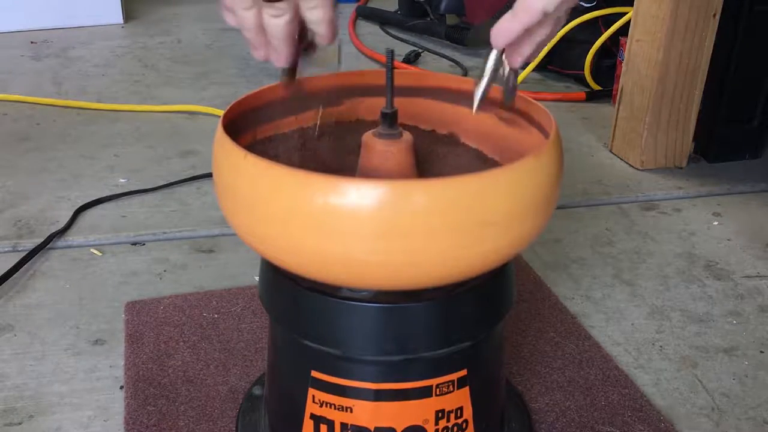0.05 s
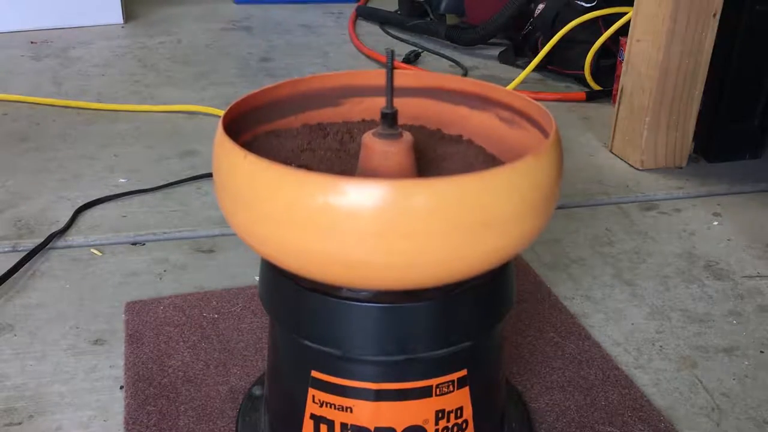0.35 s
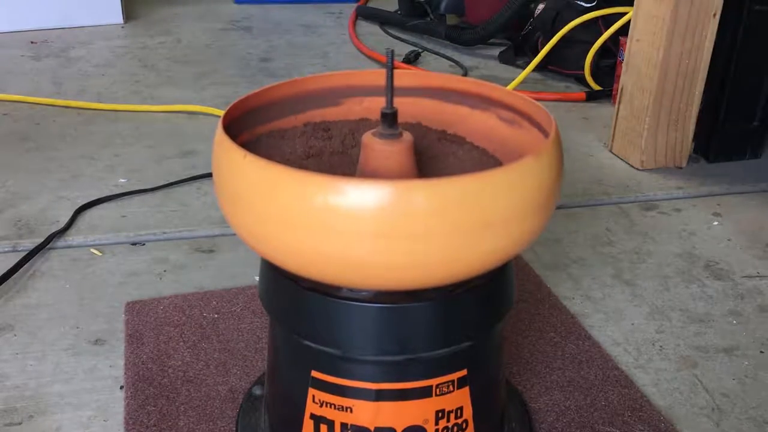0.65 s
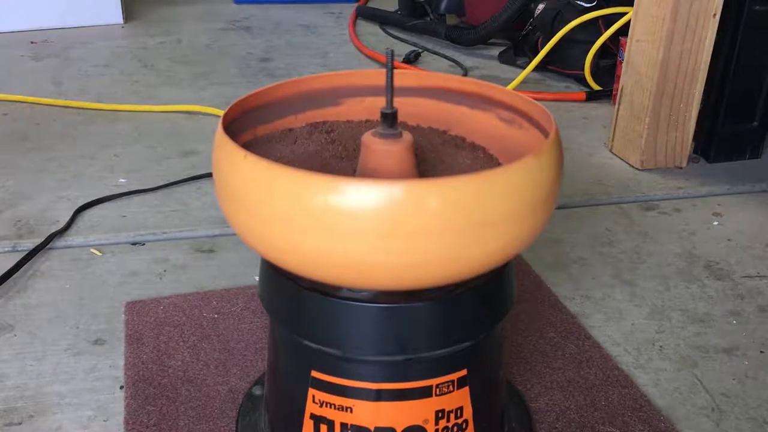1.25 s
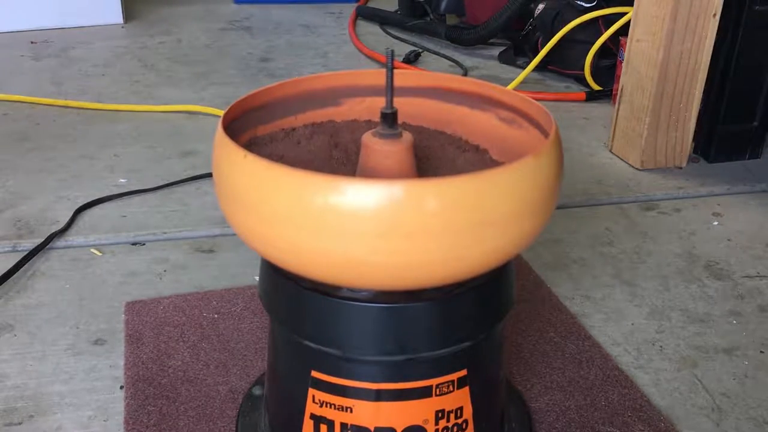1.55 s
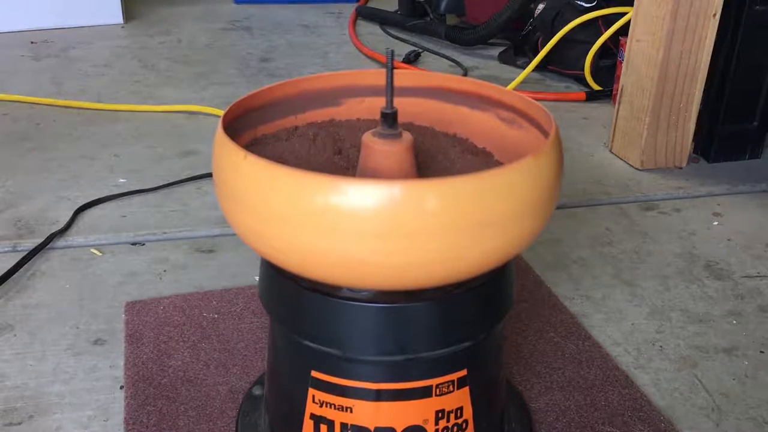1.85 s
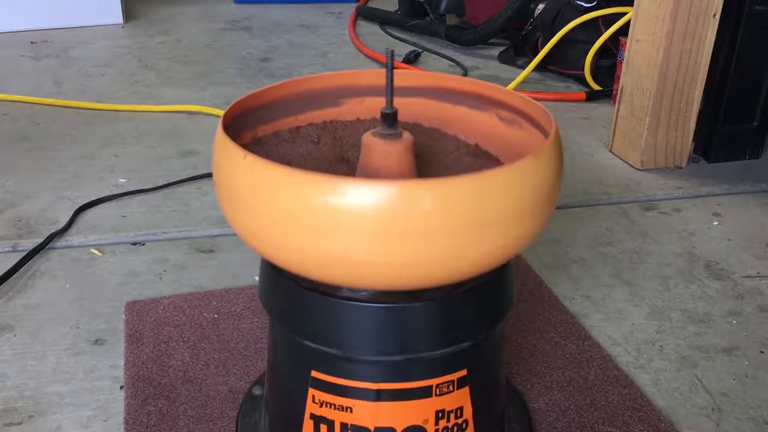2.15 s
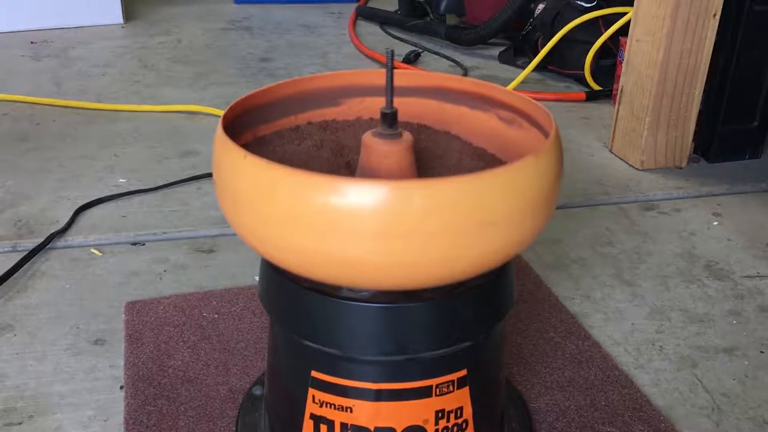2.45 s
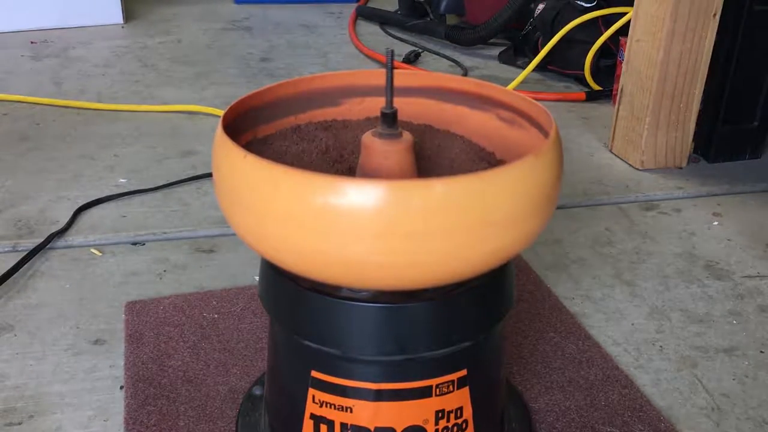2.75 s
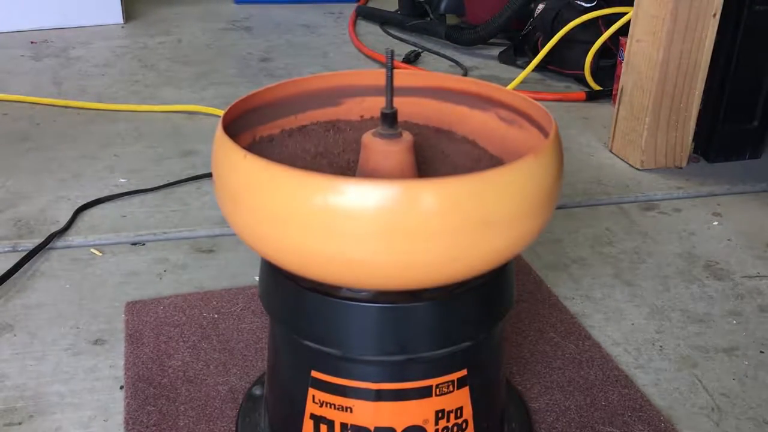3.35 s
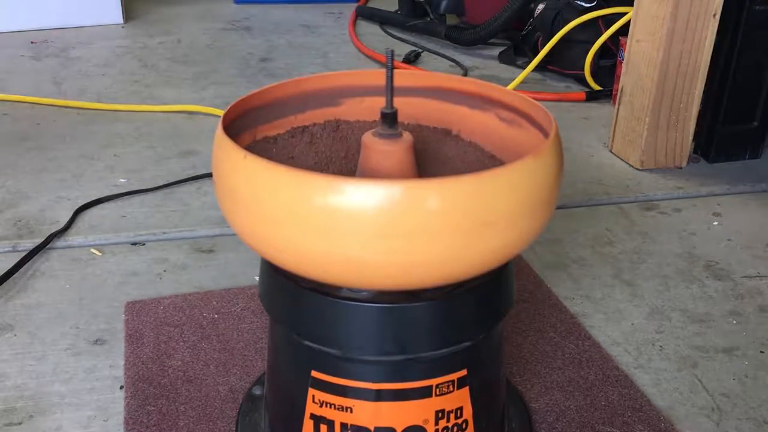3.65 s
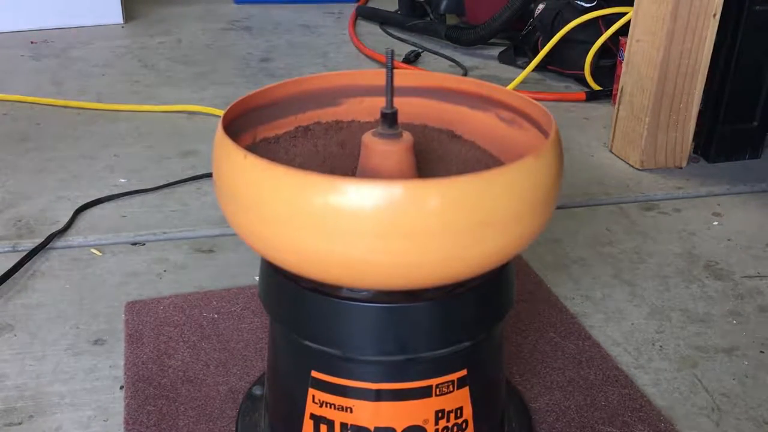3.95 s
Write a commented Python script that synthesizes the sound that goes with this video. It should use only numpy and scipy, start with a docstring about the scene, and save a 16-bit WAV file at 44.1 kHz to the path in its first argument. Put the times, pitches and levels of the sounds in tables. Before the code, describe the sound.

A vibrating tumbler hums and buzzes with hissing grit, after a brief clatter of metal pieces.

```python
"""Vibratory tumbler on a concrete floor

An unbalanced motor thumps once a turn and throbs against the mains. The plastic bowl
drones and rattles, and the polishing grit hisses inside it. Near the start a few small
metal pieces clink together and drop into the bowl, then tick now and again in the grit.
A small, hard room adds a short tail to the rattle, knocks and ticks."""
import sys
import numpy as np
from scipy import signal
from scipy.fft import rfft, irfft, next_fast_len
from scipy.io import wavfile

SR = 44100
rng = np.random.default_rng(int(sys.argv[2]) if len(sys.argv) > 2 else 0)


def pcm_store(signal):
    """Save signal as 16-bit PCM."""
    levels = np.round(np.clip(np.atleast_2d(signal), -1, 1) * 32767)
    wavfile.write(sys.argv[1], SR, levels.astype(np.int16).T)


N = 176400
T = np.arange(N) / SR

TURN_HZ, MAINS_HZ = 56.772, 60
THUMP_AT_TURN, MOUNT_LAG_RAD = .14, .96
# pieces striking the bowl: start_s, level_db, cutoff_hz, decay_s, bowl_push_db
KNOCKS = [(0.2461, -8, 14000, 0.002, -4.5), (0.2553, -25, 9000, 0.0025, -21), (0.2592, -12, 1600, .003, -5),
          (0.2694, -10, 12000, 0.0025, -23), (0.2708, -16, 3400, 0.0024, -9.5),
          (0.2808, -38, 12000, 0.006, -34), (0.284, -27, 3500, 0.016, -37)]


def from_db(db):
    """Decibels to gain."""
    return 10 ** (np.asarray(db) / 20)


def unit_rms(x):
    """Scale to unit power."""
    return x / np.sqrt(np.mean(x ** 2) + 1e-20)


def fader(points):
    """A gain curve through (time_s, level_db) points."""
    return from_db(np.interp(T, *np.transpose(points)))


def drift(rate_hz):
    """A slow random wander of unit power."""
    step, warm_up = 40, 2000
    pole = np.exp(-2 * np.pi * step * rate_hz / SR)
    noise = rng.standard_normal(N // step + warm_up + 2)
    slow = signal.lfilter([1], [1, -2 * pole, pole * pole], noise)[warm_up:]
    return np.interp(np.arange(N) / step, np.arange(len(slow)), unit_rms(slow))


def colour(x, points):
    """Minimum-phase EQ of unit power gain, shaped by (freq_hz, gain_db) points."""
    size = next_fast_len(N + SR // 4, True) // 2 * 2
    hz, db = np.transpose(sorted(points))
    bin_hz = np.fft.rfftfreq(size, 1 / SR)
    gain = unit_rms(from_db(np.interp(np.log(bin_hz + 1), np.log(hz), db)))
    cepstrum = irfft(np.log(gain))
    cepstrum[1:size // 2] *= 2
    cepstrum[size // 2 + 1:] = 0
    return irfft(rfft(x, size) * np.exp(rfft(cepstrum)))[:N]


def clicks(start_s, level_db):
    """Impulses at the given times and levels."""
    out = np.zeros(N)
    inside = (start_s >= 0) & (start_s < N / SR)
    np.add.at(out, (start_s[inside] * SR).astype(int), from_db(level_db)[inside])
    return out


def bursts(hits, decay_s):
    """Each impulse starts a dying burst of noise."""
    envelope = signal.lfilter([1], [1, -np.exp(-1 / (decay_s * SR))], hits + 1e-18)
    return envelope * rng.standard_normal(N)


def impact(start_s, level_db, cutoff_hz, decay_s):
    """One short chatter of contact, duller when the contact is soft."""
    lowpass = signal.butter(2, cutoff_hz, fs=SR, output="sos")
    hit = clicks(np.array([start_s]), np.array([level_db]))
    return signal.sosfilt(lowpass, bursts(hit, decay_s))


def ring(hits, hz, t60_s):
    """One mode: each impulse sets a dying sine ringing."""
    r, w = from_db(-60 / (t60_s * SR)), 2 * np.pi * hz / SR
    return signal.lfilter([0, np.sin(w)], [1, -2 * r * np.cos(w), r * r], hits + 1e-18)


def in_room(x, wet_db, t60_s=.25, predelay_s=.004):
    """Add the diffuse tail of a small, hard room."""
    t = T[:SR // 2]
    tail = rng.standard_normal(len(t)) * from_db(-60 * t / t60_s) * (t > predelay_s)
    return x + from_db(wet_db) * signal.fftconvolve(x, tail / np.linalg.norm(tail))[:N]


def slip_angle(t, peak_s=.525):
    """The motor lags the mains, so its pull throbs at twice the difference."""
    return 4 * np.pi * (MAINS_HZ - TURN_HZ) * (t - peak_s)


def motor():
    """One thump a turn, phase-shifted by the sprung mount; harmonics throb with the slip."""
    # motor hum: turn_harmonic, level_db, throb_depth, throb_delay_s
    harmonics = [(1, -37.5, 0, 0), (2, -37, .06, 0.0023), (3, -39, 0.02, 0.028), (4, -37.5, 0.09, 0),
                 (5, -57, 0.6, 0.11), (6, -38, 0.47, 0), (7, -36, 0.19, 0.035), (8, -49.5, 0.77, 0.062)]
    mount_hz, mount_width_hz, waver = 380.4, 23, .012
    angle = 2 * np.pi * (TURN_HZ * T - THUMP_AT_TURN)
    out = 0
    for k, db, depth, delay_s in harmonics:
        lag = MOUNT_LAG_RAD + 2 * np.arctan2(mount_width_hz / 2, mount_hz - k * TURN_HZ)
        throb = 1 + depth * np.exp(1j * slip_angle(T - delay_s)) + waver * k * drift(8)
        out += np.sqrt(2) * from_db(db) * (throb * np.exp(1j * (k * angle - lag))).real
    return out


def slip_tones():
    """The slip leaves faint tones just under two harmonics, beating against the drone."""
    # tones one throb rate below a harmonic: turn_harmonic, level_db
    tones = [(11, -61), (12, -45)]
    angle = 2 * np.pi * (TURN_HZ * T - THUMP_AT_TURN)
    lag = MOUNT_LAG_RAD + slip_angle(T)
    return sum(np.sqrt(2) * from_db(db) * np.cos(k * angle - lag) for k, db in tones)


def bowl_drone():
    """The bowl rocks over two turns: wavering partials over a rumble, throbbing with the slip."""
    # drone partials: multiple of half the turn rate, level_db
    partials = [(7, -56), (11, -52.5), (13, -55.5), (15, -52), (18, -51), (19, -49), (20, -46.5), (21, -51),
                (22, -34), (23, -37.5), (24, -38.5), (25, -47.5), (26, -51), (27, -44.5), (28, -44),
                (29, -62), (30, -54), (33, -62), (34, -74), (35, -54.5), (36, -69), (41, -57.5), (42, -54),
                (53, -54), (55, -76), (57, -61.5)]
    # EQ of the bowl's rumble: freq_hz, gain_db
    rumble_eq = [(15, -27), (45, -4), (130, -7.5), (280, -6), (370, -5.5), (460, -5), (530, -9), (600, -7),
                 (662, 1), (715, 2), (800, -3.5), (900, -10.5), (1500, -26), (4000, -45.5)]
    # swell of drone and rumble together: time_s, gain_db
    swell = [(0, 2.5), (.22, 1), (.45, -.5), (1.2, -0.2), (2.2, -0.5), (3.1, -0.2), (3.35, 1), (4, .5)]
    rumble_db, waver_depth, throb_depth, throb_delay_s = -38, .18, .084, .03
    centre_hz, delay_s, smear_s_per_hz = 626, .0111, .00031
    out = from_db(rumble_db) * colour(rng.standard_normal(N), rumble_eq)
    for k, db in partials:
        hz = k * TURN_HZ / 2
        offset_hz = hz - centre_hz
        # the bowl smears each thump: higher partials arrive later
        lag_cycles = offset_hz * (delay_s + smear_s_per_hz * offset_hz / 2)
        cycles = hz * (T - THUMP_AT_TURN / TURN_HZ) - lag_cycles
        waver = 1 + waver_depth * (drift(20) + 1j * drift(20))
        out += np.sqrt(2) * from_db(db) * (waver * np.exp(2j * np.pi * cycles)).real
    throb = 1 + throb_depth * np.cos(slip_angle(T - throb_delay_s))
    return out * throb * fader(swell)


def rattle():
    """Loose parts touch four times a turn and set the plastic buzzing."""
    # contacts within a turn: position_turns, relative_db, scatter_turns
    contacts = [(0.418, -1.5, .035), (.55, -8.5, .06), (0.718, -9.5, 0.083), (0.982, -6, 0.045)]
    # resonances of the buzzing plastic: freq_hz, gain_db
    plastic_eq = [(300, -25), (800, 2.5), (1000, 3), (1200, -3.5), (1350, -3.5), (1600, 8), (1880, -3),
                  (1990, 2), (2120, -2), (2270, 5), (2380, 9.5), (2480, -6.5), (2800, -8.5), (4200, -12),
                  (8000, -37.5)]
    # rise and fall of the rattle: time_s, level_db
    swell = [(0, -40.5), (.22, -40.5), (.44, -45), (.52, -40), (1.1, -38.5), (1.9, -36.5), (2.2, -38.5),
             (2.7, -37.5), (3.1, -40), (3.5, -37.5), (4, -36.5)]
    spread_db, throb_db, throb_delay_s = .5, .85, .023
    turns = np.arange(int(N / SR * TURN_HZ) + 1)
    hits = 0
    for position, db, scatter in contacts:
        jitter, force = rng.standard_normal((2, len(turns)))
        start_s = (turns + position + scatter * jitter) / TURN_HZ
        throb = np.cos(slip_angle(start_s - throb_delay_s))
        hits += clicks(start_s, db + spread_db * force + throb_db * throb)
    buzz = colour(bursts(hits, decay_s=.0027), plastic_eq)
    return fader(swell) * unit_rms(in_room(buzz, wet_db=-11))


def grit():
    """Countless grains are tossed and land in a hiss that pulses gently once a turn."""
    # EQ of the hiss: freq_hz, gain_db
    hiss_eq = [(200, -6.5), (1000, 8), (2700, -0.5), (3500, -1.5), (4250, 2), (4800, -4), (5400, 2.5),
               (5950, -1.5), (6600, 1), (7400, -3), (8100, -2), (8600, -2.5), (9300, -1), (10300, -7),
               (11500, -5), (13500, -8), (15700, -9.5)]
    level_db, grains_per_s, spread_db = -41, 16000, .5
    pulse_db, peak_at_turn, drift_db = 1.26, .86, .28
    grains = (rng.random(N) < grains_per_s / SR) * rng.standard_normal(N)
    grains *= from_db(spread_db * rng.standard_normal(N))
    toss_db = pulse_db * np.cos(2 * np.pi * (TURN_HZ * T - peak_at_turn)) + drift_db * drift(12)
    return from_db(level_db + toss_db) * unit_rms(colour(grains, hiss_eq))


def clinks():
    """Two metal pieces strike together, each ringing in its own high modes."""
    # metal on metal: start_s, first_piece_db, second_piece_db
    strikes = [(.05, -56, -41), (.078, -46, -41), (.098, -39, -34), (.122, -38, -37), (.2457, -48, -32),
               (0.256, -31, -25), (.273, -19, -28), (.476, -56, -42), (2.833, -54, -51)]
    # modes of the first piece: pitch_hz, gain_db, t60_s
    first_modes = [(6920, -0.5, 0.22), (15045, -23, .2), (15690, -26, .2)]
    # modes of the second piece: pitch_hz, gain_db, t60_s
    second_modes = [(6260, -4, 0.18), (6420, -22, .12), (6546, -9, .14), (15400, -7, .2), (15740, -14, .18)]
    start_s, first_db, second_db = np.transpose(strikes)
    out = 0
    for strike_db, modes in ((first_db, first_modes), (second_db, second_modes)):
        for hz, db, t60_s in modes:
            out += ring(clicks(start_s, strike_db + db), hz, t60_s)
    return out


def ticks():
    """The pieces tick now and again in the grit."""
    # light touches: start_s, level_db, cutoff_hz
    touches = [(.09, -55, 12000), (1.176, -32, 12000), (1.205, -32, 8000), (1.235, -34, 8000),
               (2.434, -32, 3600), (2.5415, -31, 4000), (2.7186, -30, 4970), (2.769, -30, 3500),
               (2.833, -32, 12000), (3.114, -35, 12000), (3.193, -30, 5000)]
    # EQ of a tick: freq_hz, gain_db
    tick_eq = [(500, -28), (1500, 5), (2300, 8), (2700, 5), (3200, -2), (6000, 0), (10000, -6),
               (16000, -26)]
    return colour(sum(impact(*touch, decay_s=.0067) for touch in touches), tick_eq)


def knocks():
    """The pieces drop into the bowl in a quick clatter."""
    # EQ of metal on plastic: freq_hz, gain_db
    knock_eq = [(100, -32), (350, -21), (520, -13), (680, -1), (950, -6), (1250, -0.5), (1800, 1),
                (2400, 0), (2950, 2), (4000, -5.5), (4800, -11.5), (5500, -6.5), (7300, -8.5), (8200, -8),
                (12000, -16.5), (16000, -16)]
    return colour(sum(impact(*knock[:-1]) for knock in KNOCKS), knock_eq)


def bowl_ring():
    """The plastic bowl rings with every knock, its modes alternating in polarity."""
    # modes of the bowl: pitch_hz, gain_db, t60_s
    modes = [(488, -16.5, 0.15), (586, -10, 0.024), (669, -4.5, .04), (770, -10.5, 0.028),
             (1220, -17.5, 0.041), (2305, -15, 0.038)]
    start_s, *_, push_db = np.transpose(KNOCKS)
    blows = clicks(start_s, push_db)
    return sum((-1) ** k * from_db(db) * ring(blows, hz, t60_s)
               for k, (hz, db, t60_s) in enumerate(modes))


def scene():
    """The tumbler and its load, close up and in mono."""
    tumbler = motor() + slip_tones() + bowl_drone() + rattle() + grit()
    pieces = clinks() + in_room(knocks() + ticks(), wet_db=-7) + bowl_ring()
    return (tumbler + pieces)[None]


def record(dry):
    """Soft saturation rounds the peaks; a steep low-pass trims the very top."""
    ceiling, cutoff_hz = .9, 15850
    lowpass = signal.ellip(12, .1, 80, cutoff_hz, fs=SR, output="sos")
    return signal.sosfilt(lowpass, ceiling * np.tanh(dry / ceiling))


dry = scene()
out = record(dry)
pcm_store(out)
```